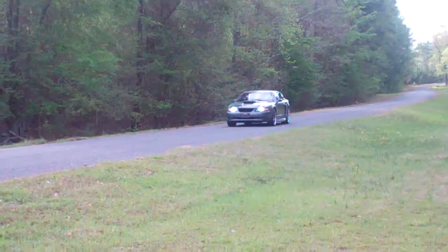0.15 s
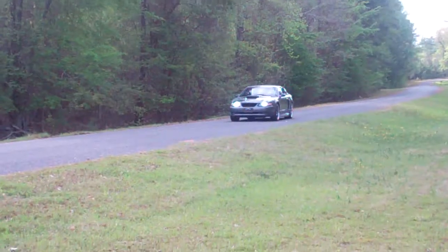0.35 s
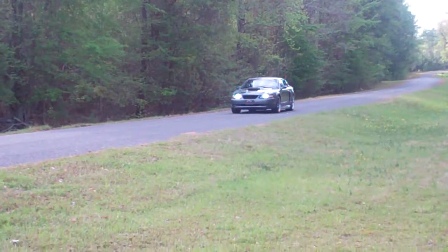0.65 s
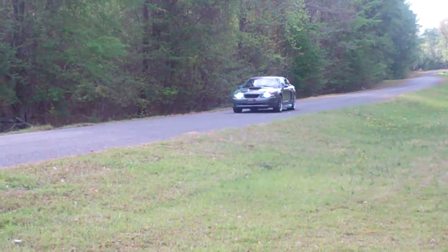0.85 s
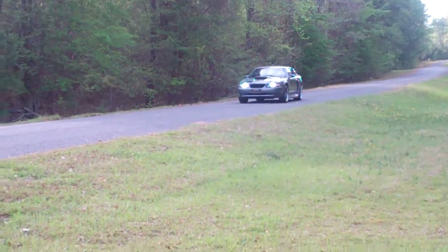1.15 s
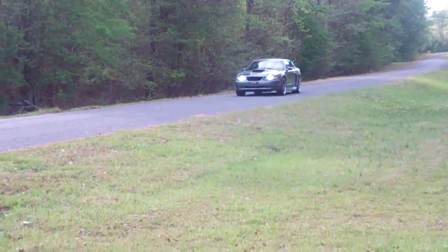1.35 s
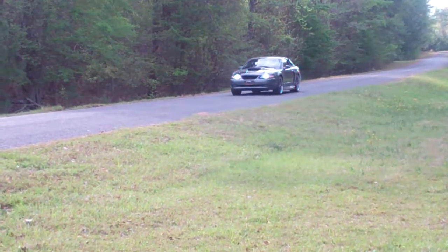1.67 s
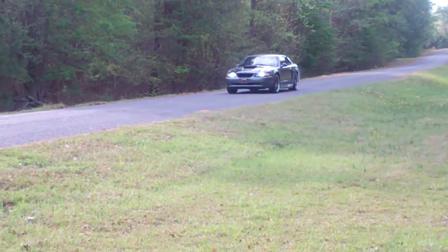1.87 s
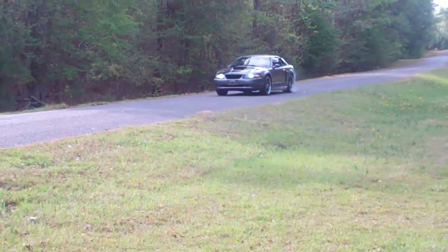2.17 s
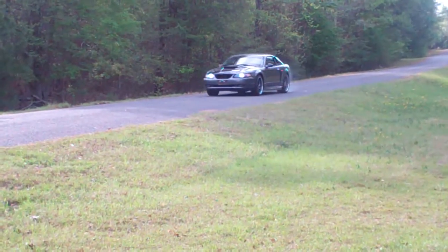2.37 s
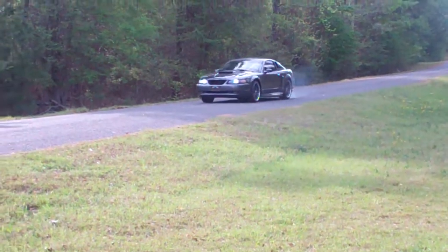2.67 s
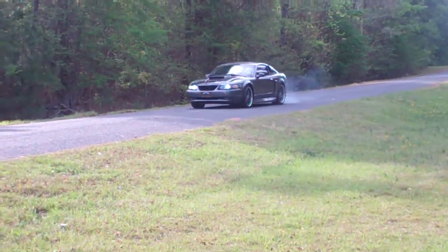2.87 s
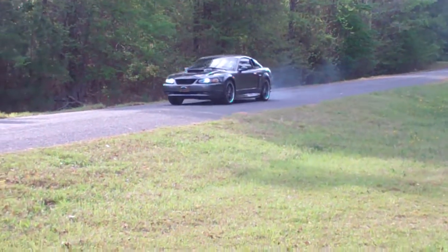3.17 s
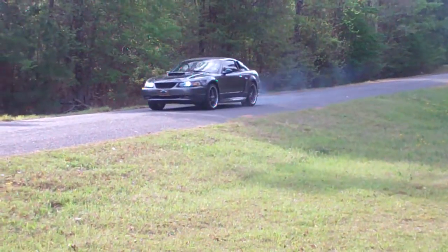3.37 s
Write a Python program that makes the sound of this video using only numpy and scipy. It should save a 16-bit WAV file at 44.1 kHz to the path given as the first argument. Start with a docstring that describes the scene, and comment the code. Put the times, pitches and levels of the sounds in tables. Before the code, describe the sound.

A V8 car engine rises from idle, revs into a raspy roar with spinning tyres, then eases.

```python
"""Coupe spinning its tyres by a wood

A V8 coupe on a road by a wood revs up from idle, spins its rear tyres, eases off and pulls away.
The exhaust booms on the engine's low orders and rasps in its pipe resonances;
the spinning tyres hiss, squeal faintly and scrub the asphalt, and the trees give a faint answer."""
import sys
import numpy as np
from scipy import signal
from scipy.fft import rfft, irfft, next_fast_len
from scipy.io import wavfile
from scipy.ndimage import uniform_filter1d, map_coordinates

SR = 44100
rng = np.random.default_rng(int(sys.argv[2]) if len(sys.argv) > 2 else 0)


def wrap_up_sound(samples):
    """Save the sound to the file named by the first command line argument, as 16-bit audio."""
    columns = np.atleast_2d(samples).T
    # keep every value between -1 and 1, then stretch to whole-number steps
    tamed = np.clip(columns, -1, 1)
    steps = np.round(tamed * 32767).astype(np.int16)
    wavfile.write(sys.argv[1], SR, steps)


N = 155232
T = np.arange(N) / SR  # time of each sample in seconds

THROTTLE_S, PEDAL_S = 0.807, 0.071  # the throttle opens; time the pedal takes
OPENING = np.clip((T - THROTTLE_S) / PEDAL_S, 0, 1)  # 0 before the throttle opens, 1 after


def amp(db):
    """Decibels as a linear gain."""
    return 10 ** (np.asarray(db) / 20)


def unit(x):
    """x scaled to an overall rms of 1."""
    return x / np.sqrt(np.mean(x ** 2) + 1e-20)


def even(x):
    """x with its slow level held at rms 1."""
    power = uniform_filter1d(x ** 2, size=5000)  # averaged over 0.11 s
    return x / np.sqrt(np.abs(power) + 1e-12)


def along(points, hz):
    """(Hz, value) points read off on a log frequency axis."""
    f, v = np.transpose(points)
    return np.interp(np.log(hz + 1), np.log(f + 1), v)


def curves(rows):
    """One value per sample for each column after the time."""
    s, *cols = np.transpose(rows)
    return [np.interp(T, s, c) for c in cols]


def wobble(rate):
    """A smooth random curve, rate knots a second."""
    return map_coordinates(rng.standard_normal(1024), [T * rate], mode="mirror")


def filtered(x, response):
    """x times a complex response of frequency."""
    m = next_fast_len(N + SR // 2)
    spectrum = rfft(x, m) * response(np.fft.rfftfreq(m, 1 / SR))
    return irfft(spectrum, m)[..., :N]


def ring(x, peaks):
    """x through parallel resonances of alternating sign."""
    def response(f):
        total = 0
        for k, (centre, width, db) in enumerate(peaks):
            damping = 1j * f * width
            total = total + (-1) ** k * amp(db) * damping / (centre ** 2 - f ** 2 + damping)
        return total
    return filtered(x, response)


def colour(x, points):
    """x through a (Hz, dB) curve."""
    return filtered(x, lambda hz: amp(along(points, hz)))


def spread(pair):
    """Two unrelated noises mixed to left and right, their likeness set by frequency."""
    # Each row: frequency in Hz, left-right likeness (1 is identical)
    likeness = [(300,0.66),(1400,.9),(3000,0.73),(7000,0.43),(14000,0.57)]

    def weights(hz):
        turn = np.arccos(np.clip(along(likeness, hz), -1, 1)) / 2
        return np.array([np.cos(turn), np.sin(turn)])
    mid, side = filtered(pair, weights)
    return unit(np.array([mid + side, mid - side]))


def tone(turns, order, rough, rate):
    """One engine order of rms about 1, wavering in size and phase."""
    angle = 2 * np.pi * (order * turns + rng.random())
    in_phase = (1 + rough * wobble(rate)) * np.sin(angle)
    across = rough * wobble(rate) * np.cos(angle)
    return np.sqrt(2) * (in_phase + across)


def firings(turns, jitter_s, scatter_db):
    """One exhaust pulse for each cylinder in turn, uneven in size and timing."""
    # Each row: pulse size, delay in firing intervals
    cylinders = [(1.43,0.023),(0.25,0.12),(0.88,0.019),(0.87,-0.035),(.55,0.16),(1.32,0.016),(0.84,0.12),(0.81,.16)]
    count = len(cylinders)
    k = np.arange(int(turns[-1] * count))
    size, delay = np.array(cylinders)[k % count].T
    chance = rng.standard_normal((len(k), 2))
    seconds = np.interp((k + delay) / count, turns, T) + jitter_s * chance[:, 0]
    at = np.clip(seconds * SR, 0, N - 2)
    size = size * amp(scatter_db * chance[:, 1])
    i = at.astype(int)
    late = at - i  # a pulse between two samples is shared by both
    return np.bincount(i, size * (1 - late), N) + np.bincount(i + 1, size * late, N)


def boom(speed, turns, firing_db, octave_db):
    """The firing tone and its octave, the orders from uneven firing and a ragged burble."""
    # Each row: time in seconds, level of the uneven orders in dB, level of the ragged burble in dB
    lope = [(.12,-10,-45.5),(.28,-1,-30),(.35,3,-33.5),(.62,-4,-28.5),(.73,-7.5,-36.5),(.82,-1,-26),(1.0,2.5,-28),(1.6,0,-30),(2.2,7.5,-37),(2.6,4,-36.5),(2.72,-2,-30.5),(3.03,4.5,-32.5),(3.09,-5,-19.5),(3.18,-4,-22.5),(3.27,2.5,-29.5),(3.36,0.5,-31.5),(3.52,-0.5,-36)]
    # Orders from uneven firing. Each row: multiple of the cycle rate, dB on throttle, dB at light throttle
    uneven_orders = [(2,-35,-16),(3,-37,-15.5),(4,-32,-29),(5,-23.5,-50),(6,-18,-15.5),(7,-31,-16),(9,-30.5,-24),(10,-33,-17),(11,-24.5,-25.5),(12,-30,-37.5),(13,-31,-31),(14,-22.5,-27),(15,-42,-32.5),(17,-29.5,-40),(18,-29,-17.5),(19,-32,-31)]
    # Exhaust response. Each row: frequency in Hz, gain in dB
    exhaust_response = [(20,-58),(60,-30.5),(100,-25.5),(125,-15),(152,-3.5),(192,-5.5),(240,-25),(300,-24.5),(390,-15.5),(500,-26.5),(630,-20.5),(790,-21),(1000,-10),(2000,-60)]
    # Tint of the burble noise. Each row: frequency in Hz, gain in dB
    burble_tint = [(20,-34),(45,-37),(70,-11.5),(100,-8),(150,1),(190,6),(240,-4.5),(360,-2),(480,-17),(700,-13.5),(1500,-55)]
    ease_from_s, ease_to_s = 2.65, 3.12  # the foot eases off, then presses again

    lope_db, burble_db = curves(lope)
    easing = np.clip(np.minimum(T - ease_from_s, ease_to_s - T) / PEDAL_S + .5, 0, 1)
    idling = np.clip((THROTTLE_S - T) / PEDAL_S + .5, 0, 1)
    light = np.maximum(easing, idling)  # 1 at light throttle, 0 on throttle
    out = amp(firing_db) * tone(turns, order=8, rough=0.089, rate=21)
    out = out + amp(octave_db) * tone(turns, order=16, rough=0.13, rate=64)
    for order, on_db, light_db in uneven_orders:
        level = lope_db + on_db + light * (light_db - on_db) + along(exhaust_response, order * speed)
        out = out + amp(level) * tone(turns, order=order, rough=0.13, rate=20)
    burble = even(colour(rng.standard_normal(N), burble_tint))
    return out + amp(burble_db) * burble


def rasp(pulses, puffs, mid_db, rasp_db, octave_db):
    """Pulses and puffs of gas ring the middle and upper resonances of the pipes."""
    # Pipe resonances: middle, lower rasp, higher rasp. Each row: centre in Hz, width in Hz, gain in dB
    mid_pipe = [(628,67,-1),(771,63,1.5),(875,116,-4)]
    rasp_low = [(1099,80,0),(1166,116,2),(1362,67,-13.5)]
    rasp_high = [(1183,89,-3),(1232,94,1),(1333,78,-8)]
    # Each row: time in seconds, share of the higher resonances (0 to 1)
    shift = [(.85,0.51),(1.2,0.24),(1.6,0.57),(2.1,1),(2.3,0.92),(2.6,0.72),(2.85,0.036),(3.1,0.41),(3.25,0.27),(3.52,0.8)]
    # Tint of what drives the rasp. Each row: frequency in Hz, gain in dB
    drive_tint = [(100,-40),(500,-15),(900,11),(1100,-1),(1380,-2),(1600,-12),(2000,10),(3000,-46),(6000,-14)]

    gas = (puffs + 1.0) * rng.standard_normal(N)
    drive = 0.73 * even(colour(pulses, drive_tint)) + even(colour(gas, drive_tint))
    high = np.clip(curves(shift)[0], 0, 1)
    buzz = even((1 - high) * unit(ring(drive, rasp_low)) + high * unit(ring(drive, rasp_high)))
    buzz_gain = amp(rasp_db - 2 - 2.8 * OPENING)

    mid_gas = (puffs + 0.48) * rng.standard_normal(N)
    middle = even(ring(even(pulses) + 1.2 * even(mid_gas), mid_pipe))
    # the octave tone takes its share of the middle band's power
    mid_power = amp(mid_db) ** 2
    middle_gain = np.sqrt(np.maximum(mid_power - amp(octave_db) ** 2, 0.18 * mid_power))
    return buzz_gain * buzz + amp(-1.5) * middle_gain * middle


def hiss(puffs, hiss_db):
    """Rushing gas and scrubbing rubber: wide noise fluttering with the firings."""
    # Tint of the hiss. Each row: frequency in Hz, gain in dB
    hiss_tint = [(300,-12),(1000,9),(1900,2),(2600,3),(4000,0.5),(5600,1.5),(8000,0),(10500,-3.5),(13000,1.5),(14300,-1)]
    air = spread(colour(rng.standard_normal((2, N)), hiss_tint))
    return amp(hiss_db + 2.46 + .9 * wobble(110)) * air * even(1 + 0.14 * puffs)


def wood(x):
    """The trees scatter a faint noise tail that starts after 25 ms and fades over half a second."""
    t60_s, level_db = 1, -9.5
    t = T[:SR // 2]
    tail = rng.standard_normal(len(t)) * amp(-60 * t / t60_s) * (t > .025)
    return amp(level_db) * signal.fftconvolve(x, tail / np.linalg.norm(tail))[:N]


def scrub():
    """The tyres scrub the asphalt: a wide band of noise that swells late."""
    # Tint of the scrub. Each row: frequency in Hz, gain in dB
    asphalt_tint = [(400,-11),(1000,-6),(1500,-4),(1750,5.5),(1980,4.5),(2300,-5.5),(3000,-9.5),(6000,-41)]
    # Each row: time in seconds, level in dB
    scrub_level = [(.8,-53),(2.05,-54),(2.32,-39),(2.6,-41),(3.15,-37),(3.4,-33)]
    return amp(curves(scrub_level)[0]) * spread(colour(rng.standard_normal((2, N)), asphalt_tint))


def squeal():
    """The slipping tread whistles in narrow resonances that follow the wheel spin."""
    # Tread resonances at rest pitch. Each row: centre in Hz, width in Hz, gain in dB
    tread_peaks = [(2510,24,2.5),(2973,36,9),(4000,68,-4),(4630,110,5.5),(5080,200,0.5),(7750,790,-10.5)]
    # Each row: time in seconds, pitch of the squeal in Hz, level in dB
    tyre_spin = [(.735,3320,-66),(.755,3330,-31.5),(.775,3310,-41),(.79,2910,-49),(.87,2970,-43),(.9,2970,-35.5),(1.2,3266,-38.5),(1.55,3306,-35.5),(2.35,3493,-38.5),(2.65,3400,-51),(2.82,3083,-36.5),(3.0,2998,-41),(3.52,3450,-48)]
    pitch, level_db = curves(tyre_spin)
    # noise rung once, then read faster or slower so that its second resonance follows the pitch
    place = np.cumsum(pitch / tread_peaks[1][0] * (1 + .005 * wobble(18)))
    rung = ring(rng.standard_normal((2, N)), tread_peaks)
    tread = np.array([map_coordinates(c, [place], mode="mirror") for c in rung])
    return amp(level_db) * spread(tread)


def strands(speed, turns, rasp_db):
    """Once the throttle opens, high orders sweep through the pipes' main resonance."""
    # High orders that stand out of the rasp. Each row: multiple of the cycle rate, level in dB
    high_orders = [(24,-1.5),(25,-1),(26,-8.5),(27,-0.5),(28,-14.5),(29,0),(30,1),(33,-0.5),(34,3.5),(36,-2),(37,2),(40,6.5),(42,-2),(45,6.5),(46,0.5),(52,3)]
    # Main resonance of the pipes. Each row: time in seconds, centre in Hz
    main_resonance = [(.85,1070),(1.0,1220),(1.25,1158),(1.6,1218),(1.95,1210),(2.35,1296),(2.6,1266),(2.95,1080),(3.08,1056),(3.25,1275)]
    centre, = curves(main_resonance)
    lines = 0
    for order, db in high_orders:
        nearness = 1 / (1 + ((order * speed - centre) / 110) ** 2)  # half at 110 Hz off centre
        lines = lines + amp(db) * nearness * tone(turns, order=order, rough=.2, rate=30)
    return amp(rasp_db - 1) * OPENING * even(lines)


def scene():
    """One engine rotation drives boom, rasp, strands and hiss; the tyres and trees join in."""
    # Each row: time in seconds, engine cycles a second in Hz
    engine = [(0.12, 7.8), (0.22, 10.2), (0.33, 13.8), (0.44, 15.3), (0.55, 16.5), (0.66, 17.2),
              (0.76, 16.9), (0.8, 18.0), (0.88, 20.7), (0.97, 24.2), (1.06, 25.6), (1.17, 24.9),
              (1.32, 28.7), (1.54, 32.3), (1.84, 38), (2.2, 44.9), (2.42, 48.2), (2.6, 50.1), (2.72, 47.3),
              (2.86, 44.6), (3.07, 40.9), (3.14, 42), (3.2, 44.4), (3.27, 41.6), (3.35, 35.9), (3.42, 36.8),
              (3.52, 36.9)]
    # Each row: time in seconds, level of the firing tone in dB
    firing_level = [(0.15, -38), (0.25, -33), (0.35, -35), (0.5, -24.5), (0.62, -20.5), (0.73, -38),
                    (0.78, -20.5), (0.83, -12), (0.9, -16), (1, -25), (1.15, -21.5), (1.33, -29),
                    (1.5, -23.5), (1.85, -22.5), (2.2, -25.5), (2.45, -32), (2.62, -32), (2.75, -31.5),
                    (2.97, -22.5), (3.06, -30), (3.14, -35), (3.22, -22.5), (3.36, -21.5), (3.48, -21)]
    # Each row: time in seconds, level of the firing tone's octave in dB
    octave_level = [(.12,-35.5),(.22,-21.5),(.3,-50),(.55,-42.5),(.74,-45),(.84,-34.5),(1.1,-36),(1.4,-36),(1.7,-42),(2.34,-32.5),(2.42,-22),(2.55,-23),(2.65,-40),(3.52,-61)]
    # Levels before each layer's trim. Each row: time in seconds, the pipe's middle band in dB,
    # the rasp in dB, the hiss in dB
    layer_levels = [(0.12, -37.5, -48.5, -51), (0.25, -43.5, -45, -47), (0.73, -40.5, -44.5, -46.5),
                    (0.76, -52, -39, -34), (0.78, -36.5, -40, -42.5), (0.92, -34, -33.5, -37),
                    (0.96, -29.5, -28, -37), (1.22, -32, -26, -33), (1.24, -29.5, -31.5, -33),
                    (1.4, -28.5, -24.5, -32.5), (2.16, -27, -26, -28), (2.35, -28.5, -20, -28.5),
                    (2.42, -26, -22.5, -30), (2.56, -21.5, -25.5, -28.5), (2.63, -31.5, -22.5, -30.5),
                    (2.8, -27.5, -26.5, -27.5), (3.03, -31, -27, -30), (3.06, -26.5, -21.5, -27.5),
                    (3.11, -31, -30, -34), (3.18, -27.5, -23.5, -32), (3.5, -28.5, -23, -34),
                    (3.52, -22, -19, -33.5)]

    speed, = curves(engine)
    firing_db, = curves(firing_level)
    octave_db, = curves(octave_level)
    mid_db, rasp_db, hiss_db = curves(layer_levels)
    turns = np.cumsum(speed * (1 + 0.0021 * wobble(20))) / SR  # engine cycles so far
    pulses = firings(turns, jitter_s=.00007, scatter_db=2.5)
    puff_shape = np.exp(-T[:SR // 50] / 0.0034)  # each puff dies away in a few ms
    puffs = even(signal.fftconvolve(pulses, puff_shape)[:N])
    pipes = rasp(pulses, puffs, mid_db, rasp_db, octave_db) + strands(speed, turns, rasp_db)
    exhaust = boom(speed, turns, firing_db, octave_db) + pipes + wood(pipes)
    return exhaust + hiss(puffs, hiss_db) + squeal() + scrub()


def record(dry):
    """The left is louder and brighter; the sound cuts in just after the start, with no treble past a limit."""
    # Each row: frequency in Hz, left minus right in dB
    left_minus_right = [(60,1.6),(200,1.26),(1300,2.16),(4300,3),(8000,5),(14000,8)]
    start_s, fade_s, top_hz = 0.1055, 0.0046, 14350
    live = dry * np.clip((T - start_s) / fade_s, 0, 1)
    halves = np.array([[.5], [-.5]])  # half the difference up on the left, half down on the right
    return filtered(live, lambda hz: amp(along(left_minus_right, hz) * halves) * (hz < top_hz))


dry = scene()
out = record(dry)
wrap_up_sound(out)
```